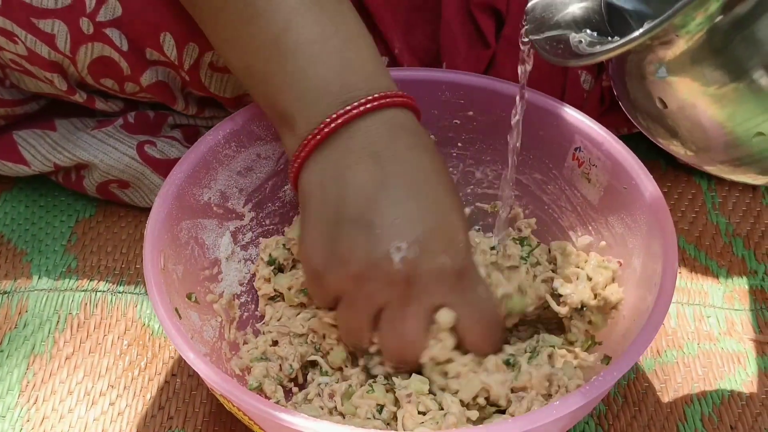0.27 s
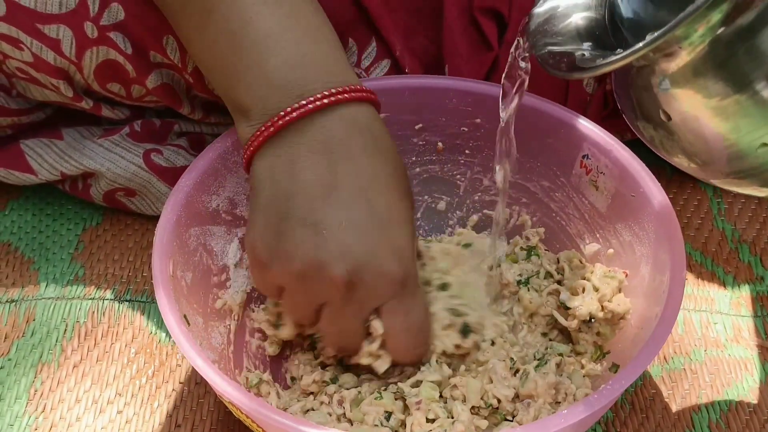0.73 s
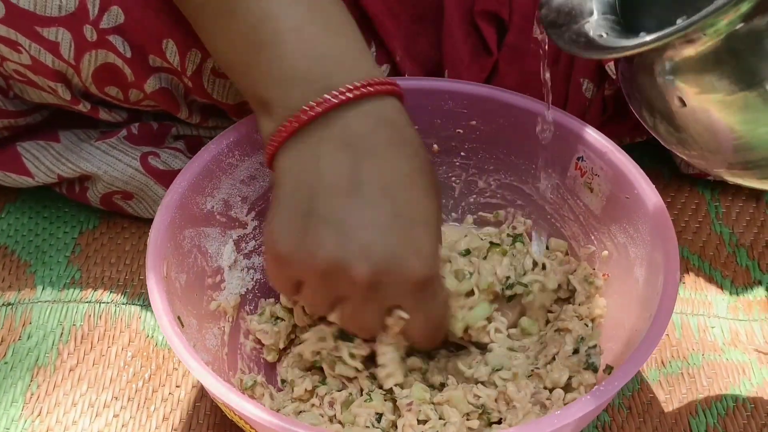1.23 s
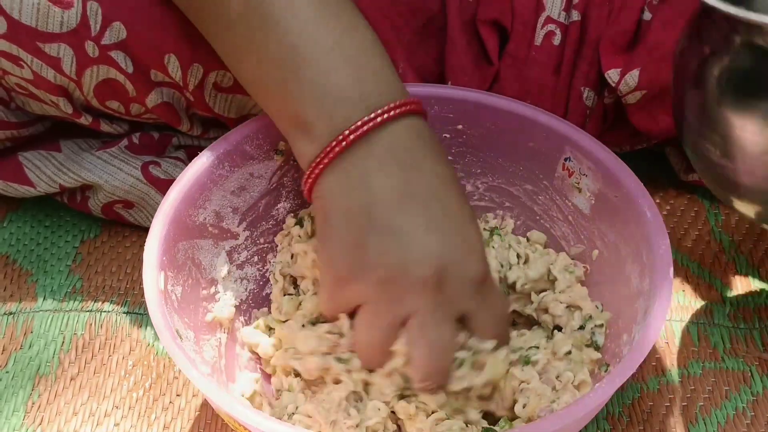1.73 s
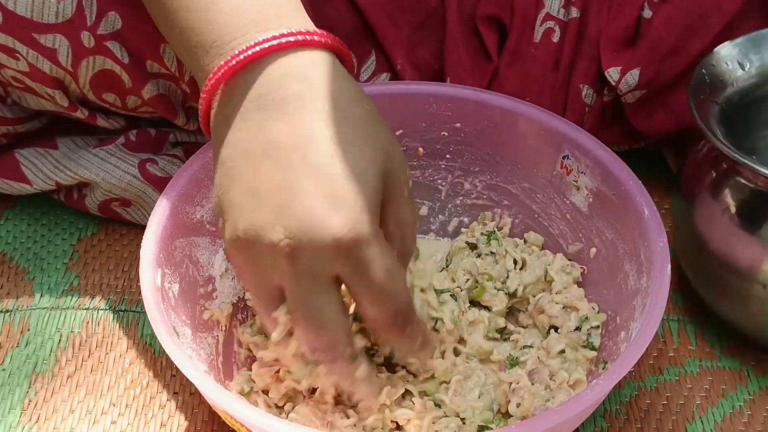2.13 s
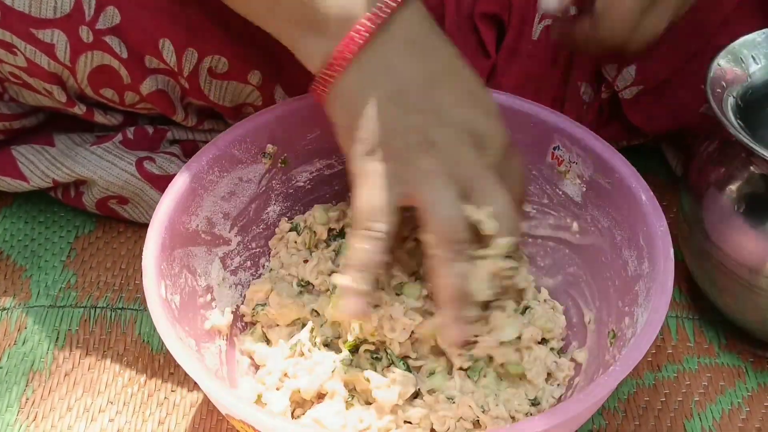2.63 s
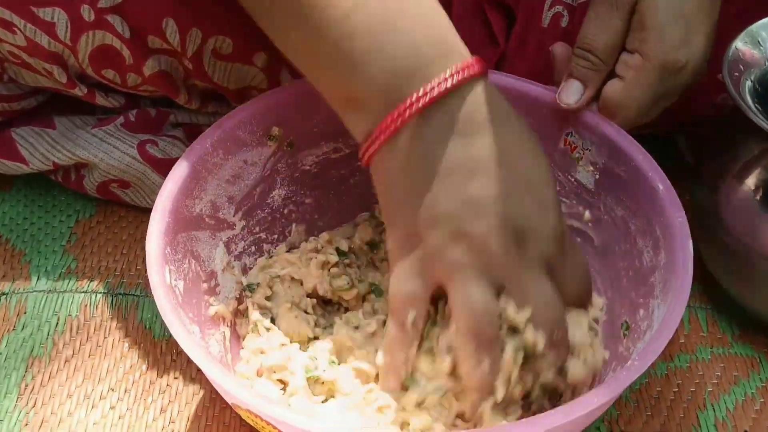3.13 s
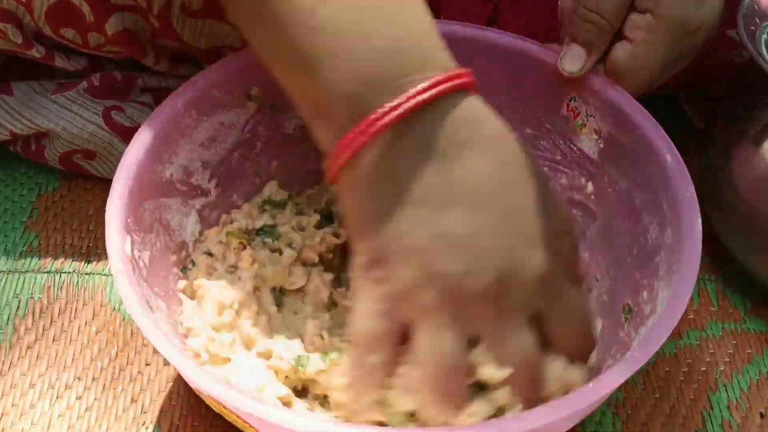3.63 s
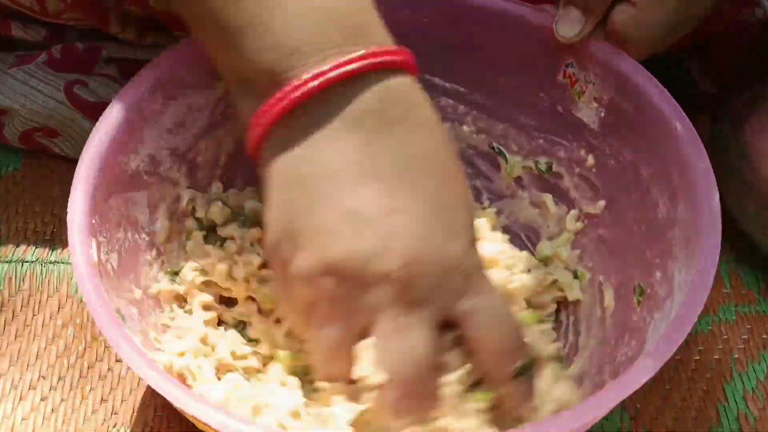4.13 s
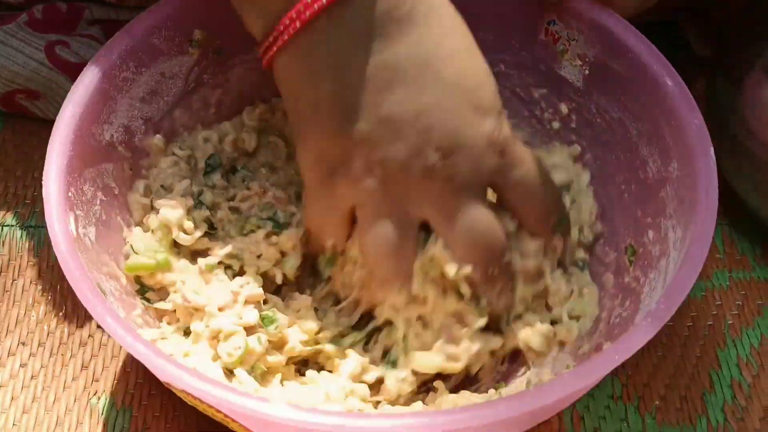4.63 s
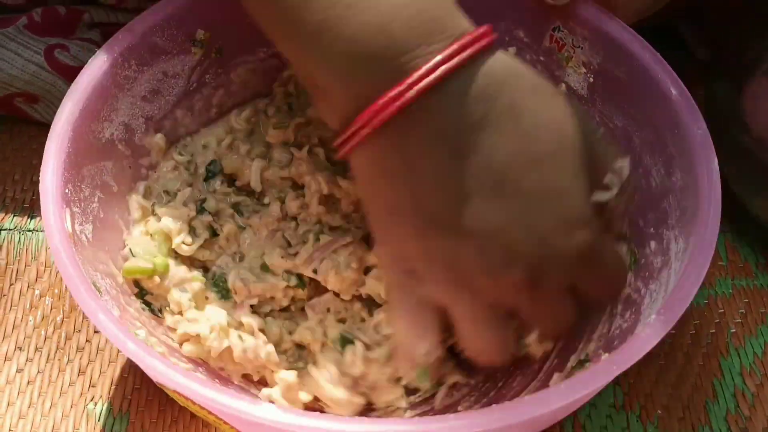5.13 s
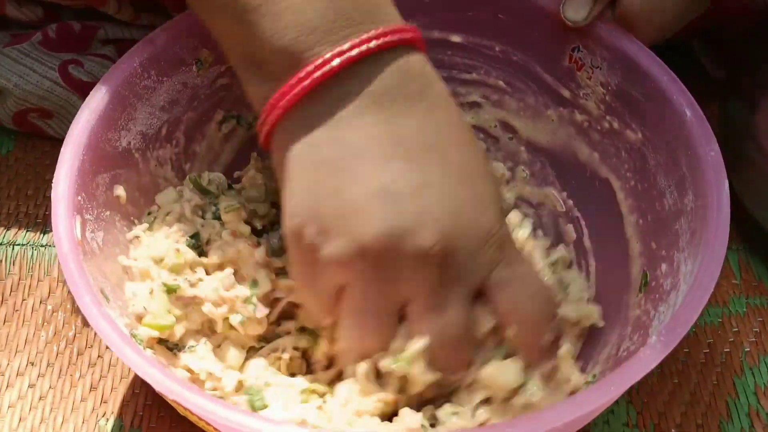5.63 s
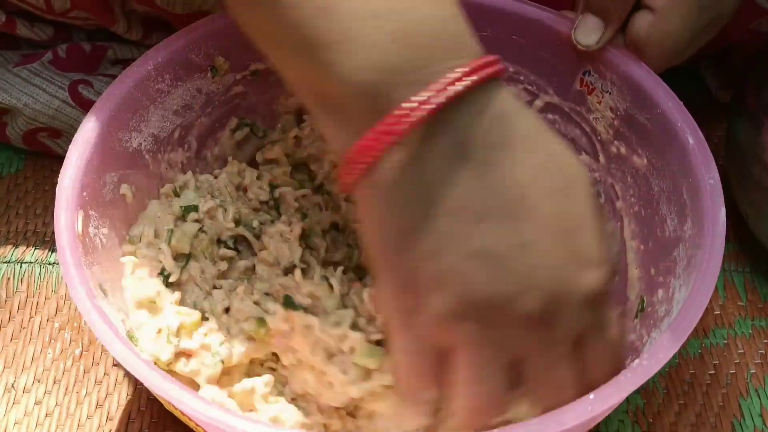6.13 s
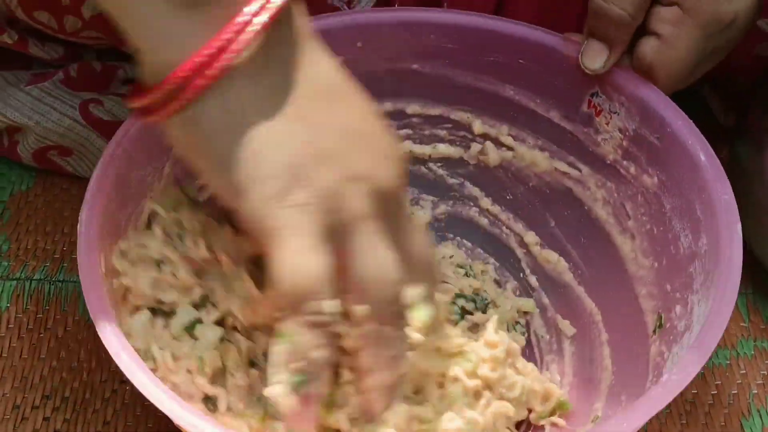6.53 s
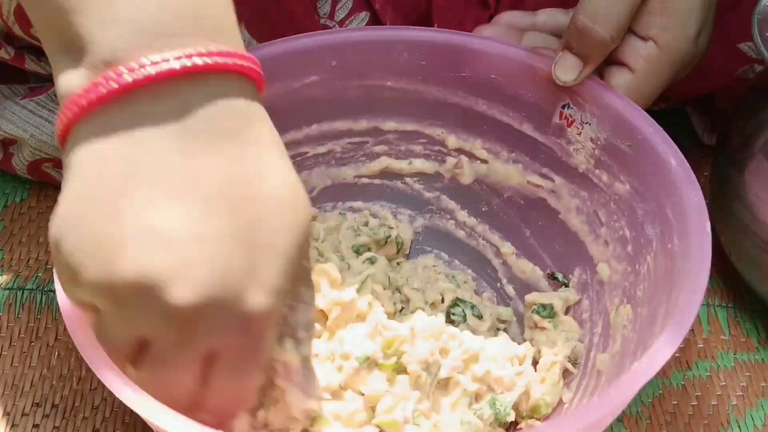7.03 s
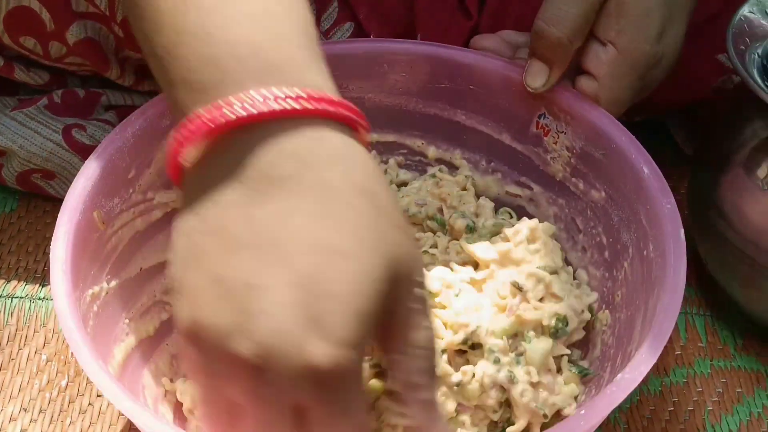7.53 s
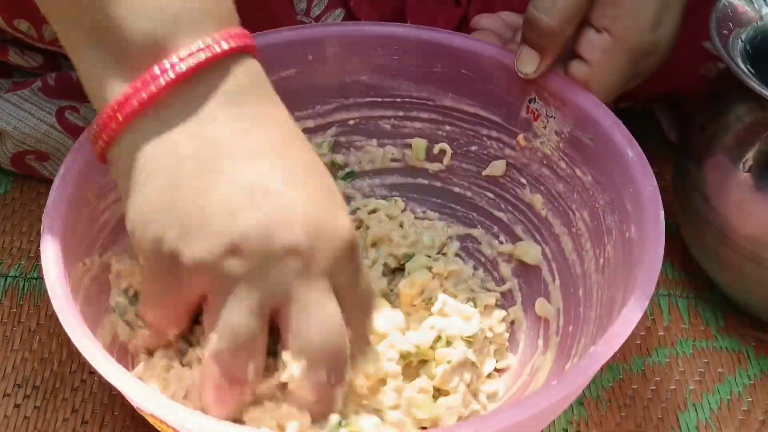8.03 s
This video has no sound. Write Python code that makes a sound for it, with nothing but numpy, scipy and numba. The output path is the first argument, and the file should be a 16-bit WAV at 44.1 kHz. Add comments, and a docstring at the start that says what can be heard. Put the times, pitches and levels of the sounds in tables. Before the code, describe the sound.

A hand squelches through wet, lumpy batter in a plastic bowl, with sticky pops, low thuds and one loud wet slap near seven seconds.

```python
"""Kneading noodle batter by hand

A hand kneads wet batter in a plastic bowl on a floor mat, close to the microphones; at first water trickles in.
Squeezes are clouds of tiny ringing air pockets and smooth hiss, gated by the fingers' stick-slip; big pockets pop.
Pushes rumble and thud low on the left, lumps slap the ringing bowl, and a wet finger squeaks once.
A steel pot and a bangle ring as struck modes, over a wavering low hum and quiet room air."""
import sys
import numpy as np
from scipy import signal
from scipy.fft import rfft, irfft, next_fast_len
from scipy.io import wavfile
from scipy.ndimage import uniform_filter1d
from numba import njit

SR = 44100
rng = np.random.default_rng(int(sys.argv[2]) if len(sys.argv) > 2 else 0)


def generate_wav(sig):
    """Save sig (samples, or channels by samples) to the path in sys.argv[1] as 16-bit PCM at SR."""
    pcm = np.round(np.clip(np.atleast_2d(sig).T, -1, 1) * 32767).astype(np.int16)
    wavfile.write(sys.argv[1], SR, pcm)


N = 364707
T = np.arange(N) / SR


def undb(db):
    """Amplitude of a level in dB."""
    return 10 ** (np.asarray(db) / 20)


def unit(x):
    """Scale to an rms of one."""
    return x / np.sqrt(np.mean(x ** 2))


def sides(pan_db):
    """Left and right gains, pan_db apart (positive is left), whose mean is one."""
    gains = undb(np.array([[pan_db], [-pan_db]]) / 2)
    return gains / gains.mean()


def add(out, s, sound):
    """Mix a sound into out from time s on."""
    start = max(int(s * SR), 0)
    out[:, start:start + sound.shape[-1]] += sound[..., :max(N - start, 0)]


def colour(x, points):
    """Causal filter with the given spectrum, built from its cepstrum; rms one."""
    hz, db = np.transpose(points)
    size = next_fast_len(N + 8192)
    size += size % 2
    bins_hz = np.arange(size // 2 + 1) * SR / size
    bins_db = np.interp(np.log(bins_hz + 1), np.log(hz), db)
    cepstrum = irfft(np.log(undb(bins_db)))
    # folding the cepstrum onto positive times makes the filter causal
    cepstrum[1:size // 2] *= 2
    cepstrum[size // 2 + 1:] = 0
    response = np.exp(rfft(cepstrum))
    return unit(irfft(rfft(x, size) * response)[..., :N])


def even(x, span_s):
    """Hold the average level steady over span_s, keeping the quicker detail."""
    power = np.mean(np.atleast_2d(x) ** 2, axis=0)
    size = max(int(span_s * SR), 8)
    smooth_power = uniform_filter1d(uniform_filter1d(power, size), size)
    return x / np.sqrt(np.abs(smooth_power) + 1e-6)


def walk(rate, size=N):
    """Random levels held 1 / rate s and slewed; spread near one."""
    hold = int(SR / rate)
    steps = np.repeat(rng.standard_normal(1024), hold)[:size]
    return 1.2 * uniform_filter1d(steps, hold)


def swells(rows, attack_s, release_s, arch_db):
    """Gain of a run of gestures (start, length, dB): each builds, arches over its middle and dies away."""
    power = 0
    for start, length, db in rows:
        along = np.clip((T - start) / length, 0, 1)
        before = np.maximum(start - T, 0) / attack_s
        after = np.maximum(T - start - length, 0) / release_s
        arch = undb(db - arch_db * (2 * along - 1) ** 2)
        power = power + arch ** 2 * np.exp(-2 * np.minimum(before + after, 20))
    return np.sqrt(power)


def pocket(t, hz, cycles, glide):
    """A small cavity opens: its ring swells, dies within some cycles and glides up."""
    age = np.maximum(t, 0) * hz / cycles
    envelope = (age * np.exp(1 - age)) ** 2
    return envelope * np.sin(2 * np.pi * cycles * age * (1 + glide * age))


def grains(count, low_hz, high_hz, cycles, spread_db, wander_db, lag_s, size):
    """A dense cloud of tiny pockets, mostly weak, each with its own pitch and place."""
    when, pitch, length, strength, sign = rng.random((count, 5)).T[:, :, None]
    place, lag = rng.standard_normal((count, 2)).T[:, :, None]
    hz = low_hz * (high_hz / low_hz) ** pitch
    level_db = spread_db * np.minimum(-np.log(1 - strength), 5)
    gain = np.sign(sign - .5) * undb(level_db)
    index = (when * N).astype(int) + np.arange(size)
    out = []
    for side in (1, -1):
        t = np.arange(size) / SR - np.maximum(side * lag * lag_s, 0)
        side_gain = gain * undb(side * place * wander_db / 2)
        rings = side_gain * pocket(t, hz, cycles * (.5 + length), 0.02)
        out.append(np.bincount(index.ravel(), rings.ravel(), N)[:N])
    return np.array(out)


def ring(modes, contact_s, lag_s, rough):
    """Modes struck through a soft contact and shaken by what they rest on; the right side hears them later."""
    t = np.maximum(np.arange(SR // 3) / SR - np.array([[0], [lag_s]]), 0)
    sound = 0
    for hz, db, t60 in modes:
        shake = rough * walk(130, size=t.shape[1]) * (1 - np.exp(-t / .006))
        decay = undb(db - 60 * t / t60)
        softening = np.hypot(1, hz * contact_s)
        sound += decay * np.sin(2 * np.pi * hz * t + shake) / softening
    sound *= (1 - np.exp(-t / contact_s)) ** 2
    return sound / np.abs(sound).max()


@njit
def resonance(x, hz, width):
    """Band-pass with a moving centre."""
    y, band, low = np.empty(len(x)), 0., 0.
    for i in range(len(x)):
        g, k = np.tan(np.pi * hz[i] / SR), width / hz[i]
        v = (band + g * (x[i] - low)) / (1 + g * (g + k))
        band, low, y[i] = 2 * v - band, low + 2 * g * v, k * v
    return y


def smear(shared):
    """Wet batter sliding over plastic: a smooth hiss, partly common to both sides."""
    noise = rng.standard_normal((3, N))
    return unit(noise[:2] + shared * noise[2])


# Colour of the room air at the microphones. Each row: frequency in Hz, relative density in dB.
ROOM_COLOUR = [(25, 15), (70, 9), (160, -9.5), (400, -11.5), (1400, -21), (3000, -16), (7800, -30.5),
               (8900, -21.5), (9900, 5.5), (11200, -10), (15500, -29)]
ROOM_DB = -65.5  # rms before the right side loses its high hiss


def room_air():
    """Quiet room air as coloured noise, its high hiss kept on the left only."""
    air = undb(ROOM_DB) * colour(rng.standard_normal((2, N)), ROOM_COLOUR)
    high_pass = signal.butter(8, 8800, "high", fs=SR, output="sos")
    right_hiss = signal.sosfiltfilt(high_pass, air[1])
    return np.array([air[0], air[1] - right_hiss])


# Spells of a faint hum behind the kneading. Each row: start in seconds, length in seconds, rms level in dB.
HUM_SPELLS = [(0, 1.35, -60.5), (1.52, 0.674, -60.5)]
HUM_HZ = 64.6
HUM_ATTACK_S, HUM_RELEASE_S = 0.0092, 0.037


def hum():
    """A faint low sine whose phase wavers."""
    phase = 2 * np.pi * HUM_HZ * T + 2.0 * walk(8.3)
    level = swells(HUM_SPELLS, HUM_ATTACK_S, HUM_RELEASE_S, 0)
    return np.sqrt(2) * level * np.sin(phase)


def reflections(x, t60_s, wet_db):
    """A short diffuse tail from the bowl's wall and the floor."""
    t = np.arange(SR // 3) / SR
    decay = np.exp(-np.log(1000) * t / t60_s) * (t > .002)
    tail = rng.standard_normal((2, len(t))) * decay
    tail /= np.sqrt(np.sum(tail ** 2, axis=1, keepdims=True))
    return undb(wet_db) * signal.fftconvolve(x, tail, axes=1)[:, :N]


# The steel pot put down nearby, a little to the left.
# Each row: time in seconds, peak level before panning in dB, extra drive of the wall modes in dB.
POT_HITS = [(1.942, -55, -21), (2.121, -34.5, 2.5), (2.166, -50.5, 5)]
# The pot, base mode first, then the wall. Each row: frequency in Hz, relative level in dB, t60 in seconds.
POT_MODES = [(779, 7, 0.15), (350, -6, 0.13), (549, -1, 0.2), (995, 9, 0.09), (1720, -3, 0.11),
             (1860, 2, .06), (2756, -11, 0.13), (3440, 5, 0.055), (4920, -6, 0.08)]
# Bangle ticks, well to the left. Each row: time in seconds, peak level before panning in dB.
TICKS = [(2.254, -45.5), (2.277, -43), (2.534, -45.5), (2.56, -48.5)]
# The bangle's metal. Each row: frequency in Hz, relative level in dB, t60 in seconds.
BANGLE_MODES = [(9500, 6, 0.032), (13840, 4, 0.02), (15200, 3, 0.036)]


def knocks():
    """The pot touches down on its base, then drops on its rim and rattles; the bangle ticks."""
    out = np.zeros((2, N))
    base, *rim = POT_MODES
    for s, db, rim_db in POT_HITS:
        modes = [base] + [(hz, mode_db + rim_db, t60) for hz, mode_db, t60 in rim]
        clank = ring(modes, 0.0004, 0.00023, rough=0.76 * undb(rim_db / 2))
        add(out, s, undb(db) * sides(3.6) * clank)
    for s, db in TICKS:
        tick = ring(BANGLE_MODES, 0.000073, 0, rough=1.8)
        add(out, s, undb(db) * sides(15.0) * tick)
    return out


def squeak(s, length_s, start_hz, end_hz, db):
    """A wet finger slides on the plastic with a faint falling squeak."""
    t = np.linspace(0, 1, int(length_s * SR))
    hz = start_hz + (end_hz - start_hz) * t ** 2 + 50 * walk(210)[:len(t)]
    tone = np.sin(2 * np.pi * np.cumsum(hz) / SR)
    out = np.zeros((2, N))
    add(out, s, undb(db) * np.sin(np.pi * t) ** 4 * tone)
    return out


# Colour of the finest spray. Each row: frequency in Hz, relative density in dB.
SPRAY_COLOUR = [(4000, -60.5), (8000, -40.5), (9100, -24), (10000, 6.5), (12500, 10.5), (15500, 3)]


def droplets():
    """The finest drops and bubbles, a sizzle in the top octave."""
    cloud = grains(count=14000, low_hz=8500, high_hz=16000, cycles=1.4, spread_db=4.8, wander_db=6.0,
                   lag_s=.00005, size=48)
    return colour(cloud, SPRAY_COLOUR)


POUR_END_S, POUR_DB, POUR_RELEASE_S = .68, -64.5, .03  # level before wavering and panning


def pour():
    """A thin, unsteady stream of water breaks into tiny droplets on the batter."""
    stream = swells([(0, POUR_END_S, POUR_DB)], POUR_RELEASE_S, POUR_RELEASE_S, 0)
    flow = stream * undb(5 * walk(45))
    return droplets() * flow * sides(6.1)


# The hand leaning on the bowl, low and left.
# Each row: start in seconds, length in seconds, rumble level before trim and panning in dB.
PUSHES = [(0, 0.12, -56), (.27, 0.13, -55), (.55, 0.18, -53), (2.57, 0.052, -49.5), (2.8, 0.096, -52.5),
          (2.98, 0.21, -46.5), (3.41, 0.33, -51.5), (3.87, 0.35, -43.5), (4.24, 0.13, -44),
          (4.53, 0.16, -57.5), (4.75, 0.42, -54.5), (5.32, 0.39, -54), (5.74, 0.21, -39), (5.99, 0.18, -36),
          (6.21, 0.19, -42), (6.63, 0.19, -45.5), (7.33, 0.15, -62.5), (8.05, 0.058, -47),
          (8.13, 0.23, -34)]
# Colour of the bowl shifting on the mat. Each row: frequency in Hz, relative density in dB.
RUMBLE_COLOUR = [(25, -48), (45, 1.5), (75, 12), (120, 8), (190, -7), (270, -23.5), (380, -37), (700, -82)]
# Firm shoves of the bowl. Each row: time in seconds, peak level before trim, low cut and panning in dB.
THUDS = [(0.686, -32.5), (1.938, -39), (2.606, -32), (3.905, -30), (4.012, -28.5), (4.114, -27.5),
         (4.18, -27), (4.56, -34.5), (5.111, -32.5), (5.342, -32.5), (5.946, -32.5), (7.334, -39.5),
         (8.122, -19.5), (8.233, -23)]
PUSH_ATTACK_S, PUSH_RELEASE_S, PUSH_ARCH_DB = 0.022, 0.024, 0.5
RUMBLE_DB, RESTING_HAND_DB = 0.5, -75.5  # trim of the rumble, level of the hand at rest before it
# a harder push rings the bowl higher
JERK_EDGE_HZ, JERK_EDGE_GAIN = 292, 13.3
# a harder shove sounds higher: pitch of the softest, rise per unit of listed peak amplitude
THUD_HZ, THUD_RISE_HZ = 84.6, 1270


def thuds():
    """The bowl shifts on the mat in small jerks and a few firm shoves; harder pushes are brighter."""
    kicks = rng.standard_normal((2, N)) * (rng.random(N) < 120 / SR)  # about 120 a second
    jerks = colour(kicks, RUMBLE_COLOUR)
    push = swells(PUSHES, PUSH_ATTACK_S, PUSH_RELEASE_S, PUSH_ARCH_DB) + undb(RESTING_HAND_DB)
    edge_pass = signal.butter(2, JERK_EDGE_HZ, "high", fs=SR, output="sos")
    edge = -signal.sosfilt(edge_pass, jerks)
    effort = push / push.max()
    shifting = (1 - effort ** 2) * jerks + JERK_EDGE_GAIN * effort * edge
    rumble = even(shifting, 0.11) * push * undb(RUMBLE_DB)
    out, t = np.zeros((2, N)), np.arange(SR // 8) / SR
    for s, db in THUDS:
        hz = THUD_HZ + THUD_RISE_HZ * undb(db)
        add(out, s, undb(db + 0.5) * pocket(t, hz, cycles=0.57, glide=0.0019))
    low_cut = signal.butter(3, 52, "high", fs=SR, output="sos")
    return signal.sosfilt(low_cut, out + rumble) * sides(48.6)  # almost all on the left


# The bowl's plastic wall, rubbed or struck. Each row: frequency in Hz, relative level in dB, t60 in seconds.
BOWL_MODES = [(610, -11, .055), (914, -10, .03), (1140, -7, .05), (1345, 0, .045), (1590, -1, .05),
              (2010, -6, .05), (2650, -5, .015), (3850, -5, .012)]
BOWL_SLAP_DB, BOWL_RUB_DB = -11, 2  # share of the wall's ring in a slap, and under rubbing


def wall(x):
    """The bowl's wall rings with whatever rubs on it."""
    rings = np.zeros((2, N))
    for hz, db, t60 in BOWL_MODES:
        width_hz = np.log(1000) / np.pi / t60
        for side in (0, 1):
            rings[side] += undb(db) * resonance(x[side], np.full(N, float(hz)), width_hz)
    return x + undb(BOWL_RUB_DB) * rings


# Lumps landing in the bowl, close by and centred.
# Each row: time in seconds, peak of the air clap in dB, pitch of the air trapped under the lump in Hz.
SLAPS = [(3.4375, -32, 1650), (3.4474, -37, 1550), (4.4005, -31, 1650), (5.66, -36, 1850),
         (5.95, -41, 1700), (6.629, -43, 1900), (7.0509, -12.7, 1330), (7.0622, -28, 1450),
         (7.079, -39, 2400), (7.322, -47, 1400), (7.3272, -34, 2300)]
# Colour of wet batter spattering from a landing lump. Each row: frequency in Hz, relative density in dB.
SPATTER_COLOUR = [(300, -21), (600, 0.5), (2400, -1.5), (3300, -3.5), (4200, -18), (9000, -27.5)]
# the spatter's level and length, for a clap at 0 dB, scale with the root of the lump's strength
SPATTER_DB, SPATTER_DECAY_S = -36, .03


def slaps():
    """A lump claps out the air under it and rings the wall, differently each time; stronger ones spatter longer."""
    out, spatter = np.zeros((2, 2, N))
    t = np.arange(SR // 3) / SR
    for s, db, air_hz in SLAPS:
        modes = [(hz, mode_db + 2 * rng.standard_normal(), t60) for hz, mode_db, t60 in BOWL_MODES]
        clap = pocket(t, air_hz, cycles=1.15, glide=0)
        bowl = undb(BOWL_SLAP_DB) * ring(modes, .0006, 0, rough=.5)
        add(out, s, undb(db) * (clap + bowl))
        size = np.sqrt(undb(db))
        add(spatter, s, size * np.exp(-t / (SPATTER_DECAY_S * size)))
    return out + undb(SPATTER_DB) * spatter * colour(smear(0.33), SPATTER_COLOUR)


# Larger air pockets bursting close to the microphones.
# Each row: time in seconds, level before trim and panning in dB, pitch in Hz, left minus right in dB.
POPS = [(0.293, -36, 6720, -5.5), (0.316, -39, 2480, 0.5), (0.329, -37, 2100, 1.5),
        (0.4235, -30, 5940, -8.0), (0.475, -39, 1350, -2.5), (0.571, -35, 1290, -1),
        (0.5795, -33, 2300, -1.5), (0.599, -41, 1250, 0), (0.62, -29, 2130, 0), (0.622, -36, 1300, 0),
        (0.647, -35, 1830, 0), (0.76, -42, 2840, 3.0), (0.889, -47, 1910, -7), (1.022, -37, 1750, -1.0),
        (1.0354, -42, 1890, 0), (1.076, -42, 3140, -4.0), (1.231, -53, 1850, 9), (1.305, -36, 2300, -6.0),
        (1.426, -40, 4860, 0), (2.761, -43, 1420, -5.5), (3.112, -38.5, 2280, -6.5), (3.155, -48, 832, 0.5),
        (3.5044, -40, 5900, -2.5), (3.963, -34, 1620, -0.5), (3.9815, -37, 1630, -0.5),
        (4.055, -32, 1910, 3.5), (4.2514, -41, 1360, -2.5), (4.285, -41, 4370, -.5), (4.383, -38, 2670, -4),
        (5.2585, -35, 1980, 5.0), (5.265, -35, 1880, 6.5), (5.336, -37, 3800, -2.5),
        (5.406, -39, 1600, -1.5), (5.449, -38, 1520, -2.5), (5.504, -35, 2000, -5.0),
        (5.5867, -40, 1910, -2.0), (6.497, -22.5, 2030, -5.0), (6.52, -27, 1940, -9.0),
        (7.493, -43, 2900, -6.5)]


def pops():
    """A big pocket bursts with smaller neighbours and a wet splutter; the highest-pitched also spit spray."""
    out, t = np.zeros((2, N)), np.arange(SR // 25) / SR
    splutter, spit = np.zeros((2, 2, N))
    for s, db, hz, pan_db in POPS:
        lag = np.array([[abs(pan_db) * .035 / hz], [0]])  # the left hears it later
        smack = pocket(t - lag, hz, cycles=1.8 + hz / 2500, glide=.005)
        for delay, size in rng.random((2, 2)):
            neighbour_hz = hz * 1.6 ** (size - .5)
            smack += undb(-9) * pocket(t - lag - .006 * delay, neighbour_hz, cycles=2, glide=0)
        add(out, s, undb(db - 2.5) * sides(pan_db) * smack)
        burst = undb(db) * np.exp(-t / .003)
        add(splutter, s + 0.00094, burst / (1 + (hz / 3500) ** 4))
        add(spit, s + .001, burst * (hz / 6000) ** 2)
    out += undb(-16.5) * splutter * colour(smear(0.47), SQUELCH_COLOUR)
    return out + undb(-28.0) * spit * colour(smear(0.99), SPRAY_COLOUR)


# the fingers stick and slip, about so many times a second; every slip sets off a flurry of bursts
SLIP_RATE, SLIP_DECAY_S, SLIP_SPREAD_DB, SLIDE_SHARE = 55, .007, 4.3, .5


def slips():
    """Uneven stick-slip: each slip starts suddenly and dies within milliseconds, over a steady slide."""
    gap, size = rng.standard_normal((1024, 2)).T
    when = (np.cumsum(np.exp(gap / 2)) * SR / SLIP_RATE).astype(int)
    kicks = np.bincount(when, undb(SLIP_SPREAD_DB * size), N)[:N]
    flurries = signal.lfilter([1], [1, -np.exp(-1 / (SLIP_DECAY_S * SR))], kicks)
    return SLIDE_SHARE + uniform_filter1d(flurries, SR // 1000)


# the hollow's ring: width in Hz, mean boost in dB, sinking and roaming of its pitch in natural-log units
HOLLOW_WIDTH_HZ, HOLLOW_DB, HOLLOW_SINK, HOLLOW_ROAM = 180, 7.5, .22, .06


def hollows(x, centre_hz, width_hz, boost_db, roam):
    """The hollow under the fingers rings with what bursts near it, and wavers in size and openness."""
    hz = np.minimum(centre_hz * np.exp(roam * walk(22)), SR / 3)
    openness = undb(boost_db + 8 * walk(11))
    return x + openness * np.array([resonance(side, hz, float(width_hz)) for side in x])


# Squeezes and sweeps of the hand in the batter, close to the microphones.
# Each row: start in seconds, length in seconds, squelch level in dB, level of the tearing wet films in dB
# (both before the layer gains), middle pitch of the hollow in Hz.
SQUEEZES = [(0, .22, -72.5, -67, 1530), (0.32, 0.21, -68.5, -66.5, 2240), (0.451, 0.045, -53, -67, 2000),
            (0.535, 0.12, -53.5, -59.5, 1800), (0.753, 0.12, -82, -71.5, 2140),
            (0.929, 0.16, -61, -67.5, 1660), (1.432, 0.012, -52.5, -53, 1750),
            (1.503, 0.11, -52, -70.5, 1970), (2.657, 0.021, -59, -70.5, 1580),
            (2.871, 0.067, -58, -88, 1620), (2.955, 0.08, -56, -74, 2040), (3.159, 0.02, -58, -67, 1650),
            (3.216, 0.063, -74, -72, 2200), (3.38, 0.07, -55, -99, 2130), (3.421, 0.11, -51, -74.5, 1880),
            (3.528, 0.13, -60, -81, 2150), (3.682, 0.26, -59.5, -72, 1700), (3.903, 0.33, -54.5, -71, 1770),
            (4.261, 0.046, -62, -64, 1280), (4.338, 0.19, -53.5, -68, 1900), (4.893, 0.092, -61, -70, 2130),
            (5.043, 0.3, -62, -73, 1930), (5.224, 0.16, -52, -65.5, 2200), (5.415, 0.089, -50.5, -70, 1530),
            (5.524, .23, -60.5, -67.5, 1870), (5.9, 0.15, -64, -111, 1410), (5.968, 0.41, -59, -72.5, 1850),
            (6.66, 0.15, -65, -88, 1760), (6.898, 0.072, -65.5, -73, 2340),
            (7.204, 0.01, -65.5, -113, 2000), (7.483, 0.26, -63, -76, 1790),
            (7.73, 0.13, -70.5, -69.5, 3780), (7.953, 0.27, -67, -71, 2100)]


def hollow_pitch():
    """Each squeeze has its own hollow, whose pitch sinks as it opens from start to end."""
    times = [s for start, length, *_ in SQUEEZES for s in (start, start + length)]
    pitches = [row[-1] * np.exp(way * HOLLOW_SINK / 2) for row in SQUEEZES for way in (1, -1)]
    return np.interp(T, np.maximum.accumulate(times), pitches)


# Colour of the squelch. Each row: frequency in Hz, relative density in dB.
SQUELCH_COLOUR = [(200, -37.5), (600, -9.5), (900, -22), (1170, -5), (1540, -2.5), (2050, 7.5), (2600, 1.5),
                  (3150, -6), (4200, -2), (9000, -55)]
# Colour of the tearing films. Each row: frequency in Hz, relative density in dB.
FILMS_COLOUR = [(900, -37), (2200, 7.5), (3200, -15.5), (4000, -6), (4800, -5.5), (6300, 2.5), (7800, 4.5),
                (8900, -3.5), (11000, -47)]
# a squeeze builds, is strongest midway and lets go; between squeezes the batter keeps creeping
SQUEEZE_ATTACK_S, SQUEEZE_RELEASE_S, SQUEEZE_ARCH_DB = 0.016, 0.017, 5
FILM_ATTACK_S, FILM_RELEASE_S, FILM_ARCH_DB = 0.0071, 0.013, 0.5
CREEP_SQUELCH_DB, CREEP_FILMS_DB = -81.5, -80  # before the layer gains
# layer gains; the spray follows the films
SQUELCH_DB, FILMS_DB, SPRAY_DB = 1.7, 3, -3.5


def batter():
    """Squeezing bursts pockets of air, smears the bowl, tears sticky films and throws a fine spray."""
    bursts = grains(count=10000, low_hz=600, high_hz=3200, cycles=1.9, spread_db=3.7, wander_db=6.0,
                    lag_s=.00018, size=340)
    snaps = grains(count=9000, low_hz=2800, high_hz=9000, cycles=2.6, spread_db=3.8, wander_db=5.0,
                   lag_s=.0001, size=180)
    slip = slips()
    squelch = slip * (colour(bursts, SQUELCH_COLOUR) + colour(smear(1), SQUELCH_COLOUR) / 2)
    films = slip * (colour(snaps, FILMS_COLOUR) + colour(smear(0.33), FILMS_COLOUR) / 2)
    squelch = hollows(squelch, hollow_pitch(), HOLLOW_WIDTH_HZ, HOLLOW_DB, HOLLOW_ROAM)
    squelch = wall(squelch)
    start, length, squelch_db, films_db, _ = np.transpose(SQUEEZES)
    pressing = swells(zip(start, length, squelch_db), SQUEEZE_ATTACK_S, SQUEEZE_RELEASE_S, SQUEEZE_ARCH_DB)
    pressing += undb(CREEP_SQUELCH_DB)
    tearing = swells(zip(start, length, films_db), FILM_ATTACK_S, FILM_RELEASE_S, FILM_ARCH_DB)
    tearing += undb(CREEP_FILMS_DB)
    out = even(squelch, 0.057) * pressing * undb(SQUELCH_DB)
    out += even(films, 0.39) * tearing * undb(FILMS_DB) * sides(-3.0)
    spray = even(slip * droplets(), 0.086) * tearing * undb(SPRAY_DB)
    return out + spray * sides(8.0)


# the right microphone is slightly nearer to the batter
LEFT_LAG_S = .00007


def scene():
    """Everything happens close by; only a short tail comes back."""
    left, right = batter()
    kneading = np.array([np.roll(left, int(LEFT_LAG_S * SR)), right])
    close = kneading + pops() + slaps() + knocks() + pour()
    close += squeak(s=4.5, length_s=.13, start_hz=4000, end_hz=3600, db=-59)
    tail = reflections(close, t60_s=.15, wet_db=-12.5)
    return close + tail + thuds() + hum() + room_air()


TOP_HZ = 15800


def record(dry):
    """The recorder cuts the top with a steep low-pass."""
    return signal.sosfilt(signal.ellip(8, .2, 70, TOP_HZ, fs=SR, output="sos"), dry)


dry = scene()
out = record(dry)
generate_wav(out)
```